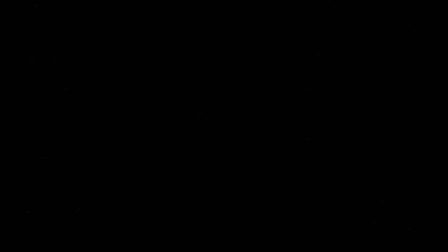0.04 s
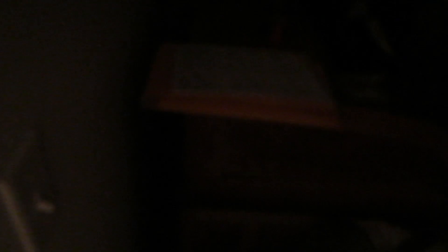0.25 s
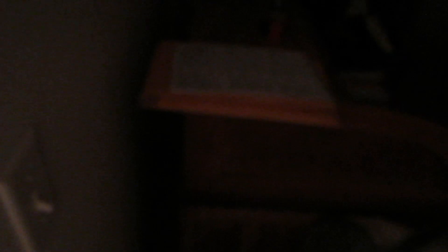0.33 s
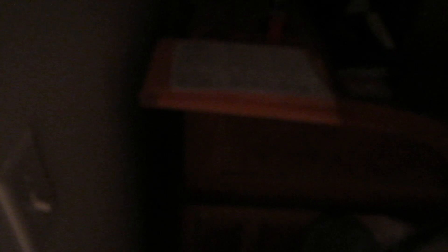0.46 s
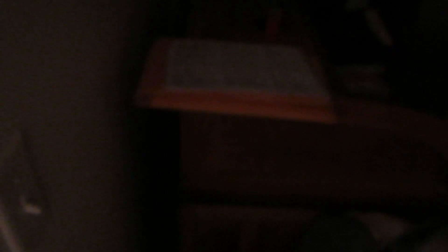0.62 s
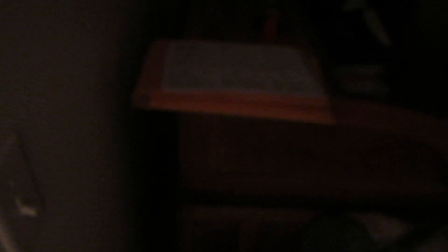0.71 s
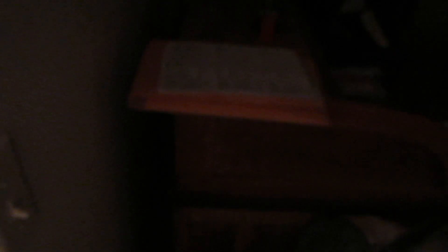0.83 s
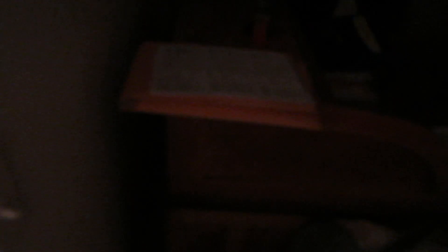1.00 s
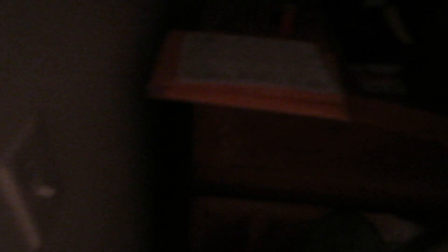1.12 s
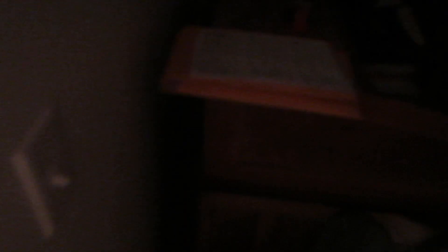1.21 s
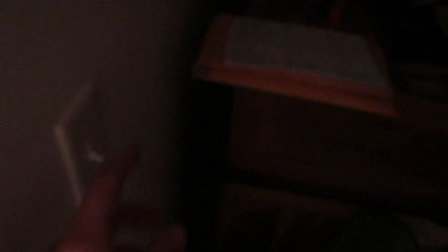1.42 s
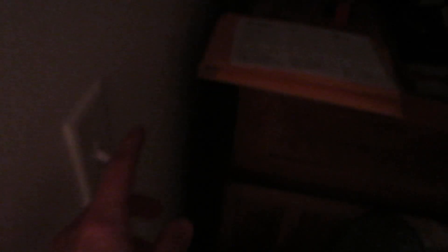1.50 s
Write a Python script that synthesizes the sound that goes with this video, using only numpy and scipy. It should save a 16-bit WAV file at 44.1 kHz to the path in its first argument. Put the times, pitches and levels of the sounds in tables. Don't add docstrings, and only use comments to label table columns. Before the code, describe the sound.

A finger rubs faintly on a wall switch, then it flips with one hard, bright snap and a brief room echo; afterwards quiet hum, faint ticks and dull thuds, picked up close by a small microphone.

```python
import sys
import numpy as np
from scipy import signal
from scipy.fft import rfft, irfft
from scipy.io import wavfile

SR = 44100
rng = np.random.default_rng(int(sys.argv[2]) if len(sys.argv) > 2 else 0)


def voltage_ratio(decibels):
    exponent = np.asarray(decibels, float) / 20
    return 10 ** exponent


def wav_out(sig):
    wavfile.write(sys.argv[1], SR, np.round(np.clip(np.atleast_2d(sig).T, -1, 1) * 32767).astype(np.int16))


N = 68355

# frequency_hz, likeness (-1 to 1)
LIKENESS = [(25, .65), (60, 0.66), (130, 0.41), (290, 0.44), (640, -0.19), (1410, -0.44), (2200, 0.14),
            (3100, 0.67), (4300, 0.045), (6820, -0.036), (10000, -0.23), (15000, 0.33)]
CONTACT_S = [.2006, .2012, .2033, .2069, .2087, .2135, .2210]
# left_right_db, hardness_db_per_octave
CONTACTS = [(-1, 3), (6.5, 9.5), (4, 5), (1, 0), (15, 2.5), (2, 18), (2, -1)]
AIR_PAN_DB = -2.5
PLATE_HIGH_HZ = 2980


def rms_one(x):
    return x / np.sqrt(np.mean(x ** 2) + 1e-20)


def in_time(rows, after_db=None):
    s, db = np.transpose(rows)
    return np.interp(np.arange(N) / SR, s, db, right=after_db)


def at_hz(points, hz):
    table_hz, value = np.array(points).T
    return np.interp(np.log(hz), np.log(table_hz), value)


def pan(db):
    return voltage_ratio(np.array([[db / 2], [-db / 2]]))


def drift(rate):
    r = np.exp(-80 * np.pi * rate / SR)
    slow = signal.lfilter([1], [1, -2 * r, r * r], rng.standard_normal(N // 40 + 2002))
    slow = slow[2000:]
    return np.interp(np.arange(N) / 40, np.arange(len(slow)), rms_one(slow))


def ring(clicks, hz, t60):
    r = voltage_ratio(-60 / (t60 * SR))
    w = 2 * np.pi * hz / SR
    return signal.lfilter([0, np.sin(w)], [1, -2 * r * np.cos(w), r * r], clicks + 1e-18)


def peak(x, hz, width_hz):
    r = np.exp(-np.pi * width_hz / SR)
    zeros = np.array([1, 0, -1]) * (1 - r * r) / 2
    poles = [1, -2 * r * np.cos(2 * np.pi * hz / SR), r * r]
    return signal.lfilter(zeros, poles, x)


def noise(spectrum, likeness, patchy_db, shape=lambda hz: 1):
    hz = np.maximum(np.fft.rfftfreq(N, 1 / SR), 1)
    low, high = spectrum[0][0], spectrum[-1][0]
    white = rfft(rng.standard_normal((2, N)))
    coloured = white * voltage_ratio(at_hz(spectrum, hz)) * (hz >= low) * (hz <= high)
    coloured = coloured / np.sqrt(np.mean(irfft(coloured, N) ** 2) * 2)
    out, together = 0, drift(1.5)
    for c in 2 ** np.arange(np.log2(low), np.log2(high) + 1 / 3, 1 / 3):
        band = np.clip(1 - np.abs(3 * np.log2(hz / c)), 0, 1)
        mid, side = irfft(coloured * band, N)
        alike = np.clip(at_hz(likeness, c), -1, 1)
        gain = voltage_ratio(patchy_db * (.5 * together + drift(12.7))) * shape(c)
        out = out + gain * (np.sqrt(1 + alike) * mid + np.sqrt(1 - alike) * side * [[1], [-1]])
    return out * np.sqrt(2)


def strikes(rows, modes, spread_db):
    s, db, pan_db, tilt_db = np.transpose(rows)
    out, chance = 0, rng.standard_normal((len(s), len(modes), 2))
    for k, (hz, share_db, t60) in enumerate(modes):
        blow_db = db + share_db + tilt_db * np.log2(hz / 1500)
        ear_db = spread_db * chance[:, k].T + np.outer([.5, -.5], pan_db)
        clicks = np.zeros((2, N))
        clicks[:, (s * SR).astype(int)] = voltage_ratio(blow_db + ear_db)
        if hz < PLATE_HIGH_HZ:
            soft = signal.butter(4, PLATE_HIGH_HZ, fs=SR, output="sos")
            clicks = signal.sosfilt(soft, clicks + 1e-18)
        out = out + ring(clicks, hz, t60)
    return out


def dying(start_s, t60):
    t = np.arange(N) / SR - start_s
    return (t > 0) * voltage_ratio(-60 * np.maximum(t, 0) / t60)


def lagged(x):
    lag_s = .00007
    return np.array([x[0], np.roll(x[1], round(lag_s * SR))])


def room_tone():
    # frequency_hz, density_db
    hum = [(15, -83), (25, -3.5), (43, -14.5), (75, 0), (177, -2.5), (199, -2.5), (285, -1), (472, -7),
           (600, -19.5), (780, -21), (1320, -120)]
    air = [(350, -28), (600, -3), (805, -4.5), (921, -5), (1130, -2), (1710, -16), (1880, -14), (4000, -36),
           (5200, -74), (8800, -120)]
    hiss = [(2350, -53), (4000, -6), (4670, 0), (6160, 0), (6790, 3), (8950, -4), (10300, -1),
            (11300, -11.5), (15800, -12)]
    # start_s, level_db
    boom_swell = [(0.0, -49), (0.184, -38.5), (0.214, -58), (0.4, -51), (0.47, -53), (0.496, -51),
                  (0.586, -83), (0.676, -56), (0.702, -68), (0.732, -47), (1.096, -52.5), (1.346, -46),
                  (1.368, -38.5), (1.55, -42)]
    boom_hz, boom_width_hz, boom_db = 79.2, 12.92, -9.5
    pitch_hz = boom_hz + boom_width_hz / 2 * drift(4.5)
    boom = np.sqrt(2) * np.sin(2 * np.pi * np.cumsum(pitch_hz) / SR)
    boom = voltage_ratio(boom_db + in_time(boom_swell)) * boom
    hum_sound = voltage_ratio(-48.5) * pan(-1) * noise(hum, LIKENESS, 0.35)
    air_sound = voltage_ratio(-54) * pan(AIR_PAN_DB) * noise(air, LIKENESS, 0.91)
    hiss_sound = voltage_ratio(-72.5) * noise(hiss, LIKENESS, 0.29)
    return hum_sound + air_sound + hiss_sound + boom


def motor():
    # start_s, level_db
    load = [(0, -59), (.7, -64.5), (.8, -64), (.95, -80), (1.05, -53.5), (1.17, -61), (1.25, -61.5),
            (1.42, -74), (1.48, -56), (1.55, -64)]
    # pitch_hz, level_db
    whine = [(490, -30), (978, -2.5), (1468, -5)]
    wobble_hz = 5.3
    turn = 2 * np.pi * np.cumsum(1 + wobble_hz / 978 * drift(7.1)) / SR
    lines = sum(voltage_ratio(db + 2.2 * drift(9.6)) * np.sqrt(2) * np.sin(hz * turn) for hz, db in whine)
    return pan(AIR_PAN_DB) * voltage_ratio(in_time(load)) * lines


def thuds():
    # start_s, length_s, level_db, pitch_hz
    movements = [(0.021, 0.031, -44, 214), (0.281, 0.0073, -37, 271), (.345, 0.0092, -46.5, 260),
                 (0.443, 0.0087, -46, 338), (0.518, 0.035, -51.5, 317), (0.624, 0.037, -44.5, 280),
                 (0.671, 0.0084, -46.5, 325), (0.384, 0.0088, -58, 630), (0.624, 0.025, -52, 750),
                 (0.616, 0.029, -62, 1510), (0.752, 0.028, -49, 213), (1.036, 0.025, -46.5, 306),
                 (1.084, 0.019, -50.5, 248), (1.311, 0.024, -48.5, 301), (1.368, 0.013, -45.5, 285)]
    width_hz = 79
    t, white = np.arange(N) / SR, rng.standard_normal((2, N))
    white = white[0] + 0.24 * white[1] * [[1], [-1]]
    out = 0
    for s, length, db, hz in movements:
        swell = np.exp(-((t - s) / length) ** 2)
        dull = swell * peak(peak(white, hz, width_hz), hz, width_hz)
        out = out + voltage_ratio(db) * dull * np.sqrt(np.sum(swell ** 2) * 2 / np.sum(dull ** 2))
    return out


def clock():
    # start_s, level_db
    beats = [(.391, -39), (.512, -49), (.591, -45), (.791, -37), (.991, -32.5), (1.19, -46), (1.388, -47),
             (1.491, -49)]
    # pitch_hz, level_db, t60_s
    case_modes = [(684, -8.5, 0.016), (825, -10.5, 0.01), (950, -8, 0.017), (1100, -10, 0.018),
                  (6650, -36, 0.0069), (8300, -18, 0.0075), (9700, -24, 0.0069), (10900, -33, 0.0071)]
    pan_db, rebound_s, rebound_db, rebound_tilt_db = -6, 0.00272, -4.5, -3
    blows = []
    for s, db in beats:
        blows.append((s, db, pan_db, 0))
        blows.append((s + rebound_s, db + rebound_db, pan_db, rebound_tilt_db))
    return strikes(blows, case_modes, 0.56)


def sleeve():
    # start_s, level_db
    motion = [(0, -70), (.2, -66.5), (.45, -76.5), (.7, -72), (.98, -71), (1.03, -61.5), (1.26, -62),
              (1.33, -61), (1.45, -63), (1.55, -59.5)]
    # frequency_hz, density_db
    rustle = [(1940, 11), (3300, -8), (3860, -4), (4610, -2.5), (6880, 1), (9930, 0.5), (13200, -8.5),
              (15800, -14)]
    body = [(290, -30), (500, -4), (742, 0), (876, -4), (1000, 2), (1440, -5), (3300, -30), (4290, -92),
            (7260, -120)]
    motion_db = in_time(motion)
    brightens = 0.29
    brighter = lambda hz: voltage_ratio(brightens * np.log2(hz / 7000) * (motion_db + 66.5))
    bright = pan(2) * noise(rustle, LIKENESS, 1.0, brighter)
    dull = voltage_ratio(12) * pan(AIR_PAN_DB) * noise(body, LIKENESS, 0.67)
    return voltage_ratio(motion_db) * (bright + dull)


def finger():
    # start_s, level_db
    pressure = [(0, -56.5), (.014, -40), (.024, -54), (.033, -48), (.06, -58), (.078, -48.5), (.108, -43),
                (.133, -41), (.15, -49), (.185, -51.5), (.197, -38.5)]
    # pitch_hz, width_hz, level_db
    rub_peaks = [(1031, 97, 8.5), (1163, 61, 7), (589, 140, 4.5), (1377, 240, 1), (1960, 330, -7),
                 (228, 240, -0.5)]
    rub_db, grains_per_s, pan_db = -3, 7400, 2
    grains = (rng.random((2, N)) < grains_per_s / SR) * rng.standard_normal((2, N))
    grains = rms_one(grains[0] + 0.53 * grains[1] * [[1], [-1]])
    grains = grains * voltage_ratio(rub_db + in_time(pressure, after_db=-120))
    out = 0
    for hz, w, db in rub_peaks:
        level = voltage_ratio(db) * np.sqrt(SR / 4 / w)
        out = out + level * peak(peak(grains, hz, w), hz, w)
    return pan(pan_db) * out


def room_answer():
    # frequency_hz, density_db
    tail_low = [(130, -27), (215, 6.5), (411, -2.5), (520, -7.5), (700, -0.5), (1000, -3.5), (1300, -4.5),
                (1900, -6.5), (2470, -5.5), (2800, -8.5), (3150, -13), (3600, -30.5), (4680, -57),
                (7920, -120)]
    tail_high = [(2120, -34), (3600, 0), (5160, -5), (6280, -6), (7730, -2.5), (12000, -11), (15500, -29)]
    # frequency_hz, t60_s
    room_t60 = [(200, 0.25), (700, 0.38), (1200, .4), (2000, 0.4), (3000, 0.36), (6000, 0.4), (12000, 0.26)]
    # frequency_hz, likeness (-1 to 1)
    tail_likeness = [(60, 0.67), (180, 1), (550, 0.9), (1650, 0.55), (4970, 0.19), (15000, -0.26)]
    # pitch_hz, width_hz, extra_gain
    cavity = [(266, 21, 0.4), (620, 110, 0.47), (900, 25, 0.39), (1146, 42, 1.95), (1450, 69, 0.68),
              (2240, 50, 0.65), (2480, 63, 1.2), (5220, 350, 0.89)]
    s, rise_s = CONTACT_S[2], .009

    def shape(hz):
        build_up = 1 - dying(s, np.log(1000) * rise_s * np.clip(1500 / hz, 1, 3))
        return dying(s, at_hz(room_t60, hz)) * build_up

    tail = voltage_ratio(-25) * noise(tail_low, tail_likeness, 0.18, shape)
    tail = tail + voltage_ratio(-39.5) * noise(tail_high, tail_likeness, 0.55, shape)
    tail = tail + sum(gain * peak(tail, hz, width_hz) for hz, width_hz, gain in cavity)
    return pan(1.5) * tail


def plate():
    plate_hz = [242, 375, 504, 615, 807, 887, 1042, 1100, 1177, 1333, 1518, 1908, 2420, 2610]
    # share_db, t60_s
    plate_modes = [(-14.5, 0.067), (-28.5, 0.43), (-28, 0.14), (-18.5, 0.1), (-51, 0.088), (-21.5, 0.065),
                   (-36, 0.14), (-10, 0.022), (-12, 0.079), (-17, 0.02), (-29, 0.058), (-26, 0.02),
                   (-31, 0.029), (-36, 0.076)]
    contact_db = [-24, -6, -2, -8, -12, -13, -15]
    left_right, tilt_db = np.transpose(CONTACTS)
    modes = [(hz, db, t60) for hz, (db, t60) in zip(plate_hz, plate_modes)]
    blows = np.transpose([CONTACT_S, contact_db, left_right, tilt_db])
    return lagged(strikes(blows, modes, 0.61))


def crack():
    # frequency_hz, density_db
    crack_spectrum = [(1760, 13.5), (3000, 6.5), (3870, -28), (4700, -10), (6200, -11), (8070, -3.5),
                      (8950, -10.5), (12200, -10.5), (15500, -50)]
    # frequency_hz, likeness (-1 to 1)
    crack_likeness = [(2000, .9), (6000, 0.88), (15000, 0.46)]
    crack_db = [-39.5, -24, -26]
    t60_s, lead_s = 0.017, .0003
    left_right = np.transpose(CONTACTS)[0]
    bursts = 0
    for s, db, pan_db in zip(CONTACT_S, crack_db, left_right):
        bursts = bursts + voltage_ratio(db) * pan(pan_db) * dying(s - lead_s, t60_s)
    return lagged(bursts * noise(crack_spectrum, crack_likeness, 0))


def switch():
    low_hz = 178
    high_pass = signal.cheby2(8, 32, low_hz, "high", fs=SR, output="sos")
    return signal.sosfilt(high_pass, plate() + room_answer()) + crack()


def scene():
    background = room_tone() + motor() + thuds() + clock()
    return background + sleeve() + finger() + switch()


def band_limit(x):
    return signal.sosfilt(signal.butter(12, 15970, fs=SR, output="sos"), x)


def record(dry):
    notch = 0.7 * peak(dry, 3780, 600)
    bump = 0.39 * peak(dry, 6850, 310)
    low_pass = signal.ellip(12, .5, 70, 15800, fs=SR, output="sos")
    mix = signal.sosfilt(low_pass, dry - notch + bump)
    return band_limit(mix)


dry = scene()
out = record(dry)
wav_out(out)
```